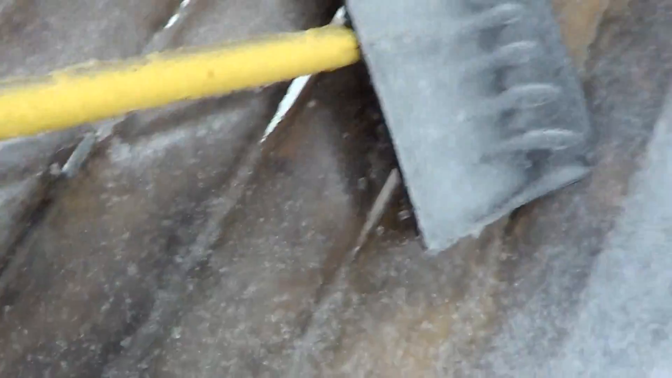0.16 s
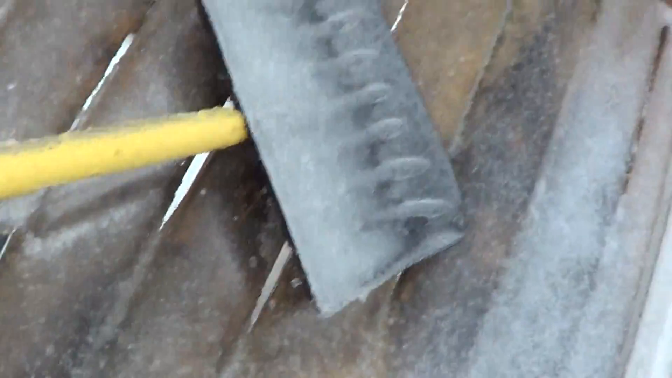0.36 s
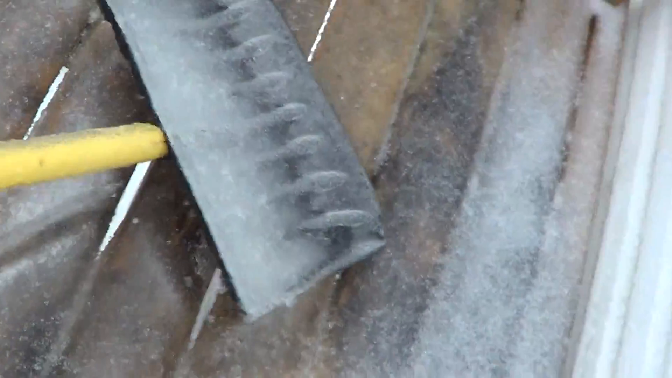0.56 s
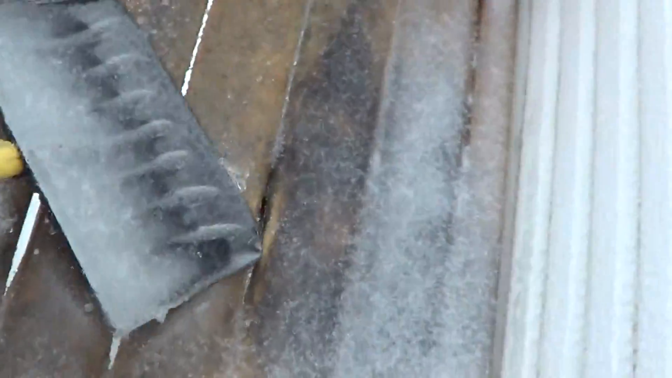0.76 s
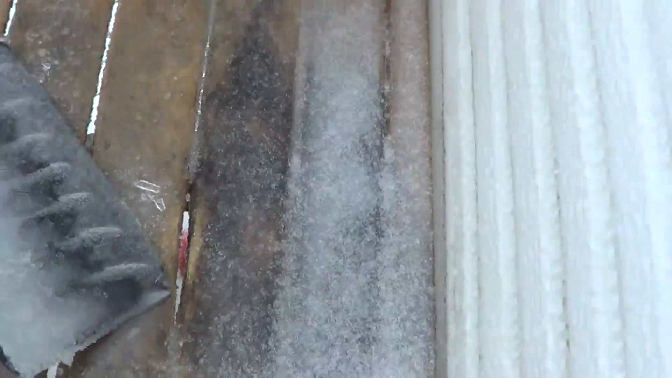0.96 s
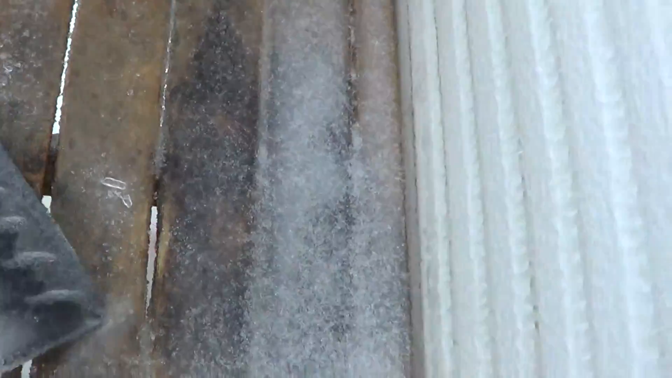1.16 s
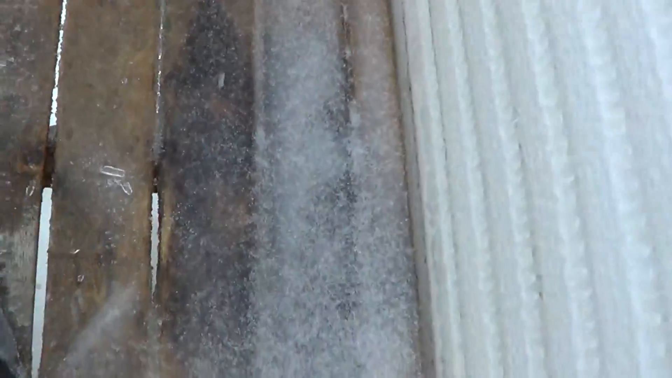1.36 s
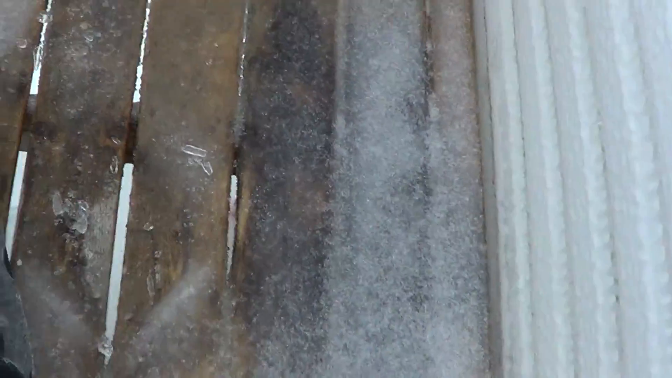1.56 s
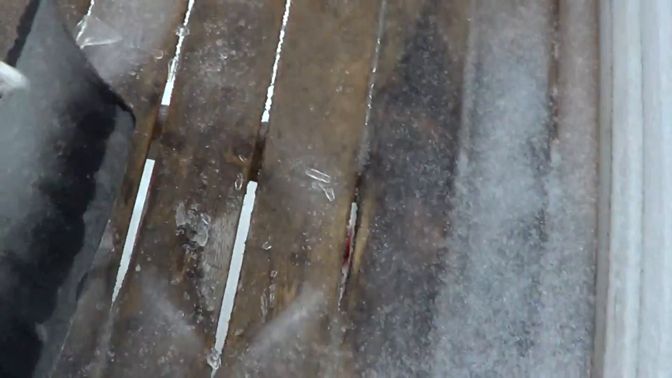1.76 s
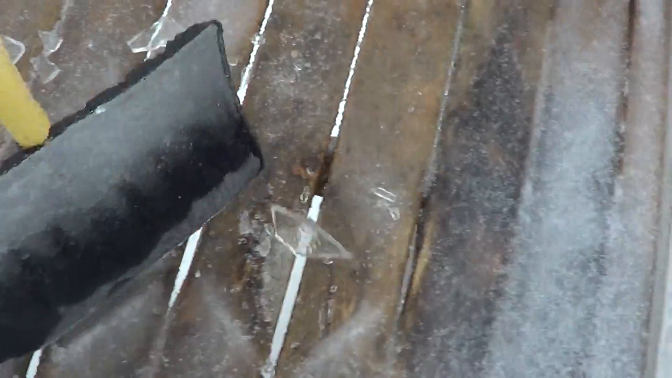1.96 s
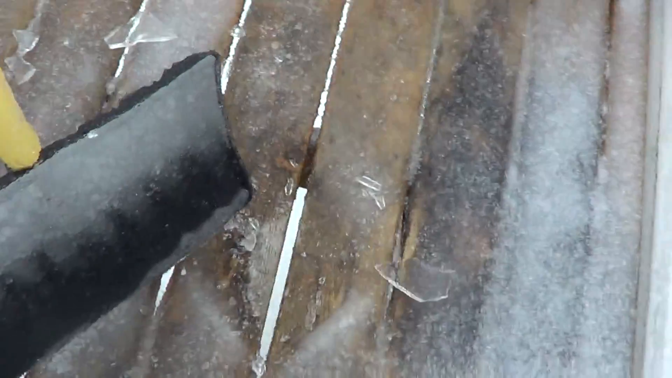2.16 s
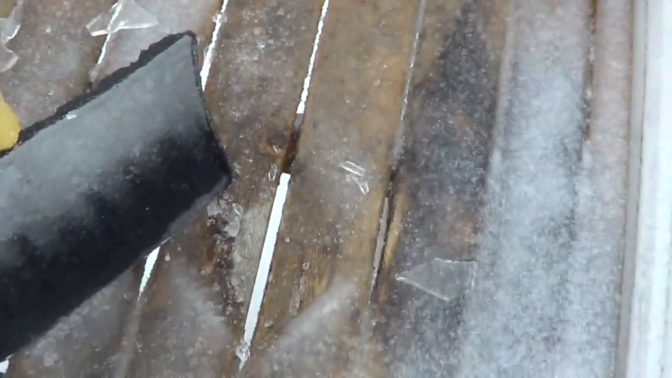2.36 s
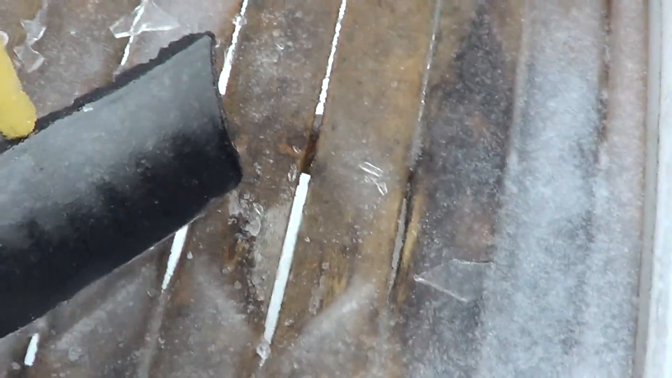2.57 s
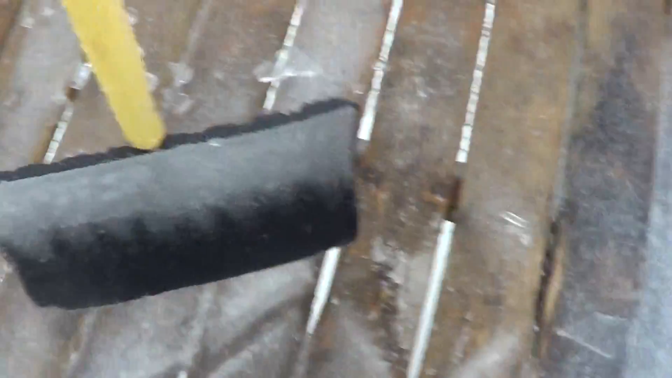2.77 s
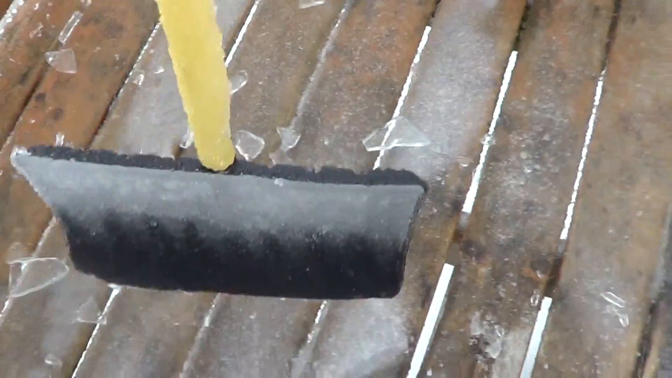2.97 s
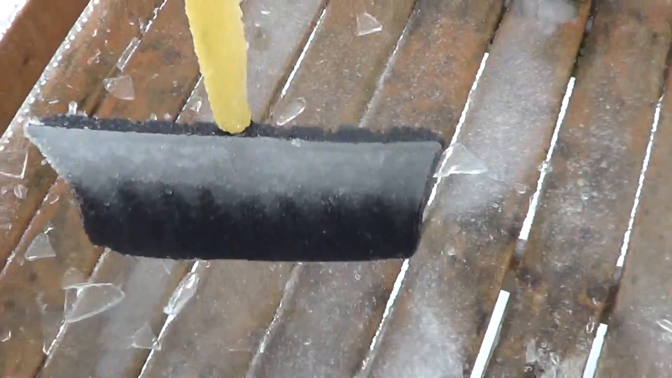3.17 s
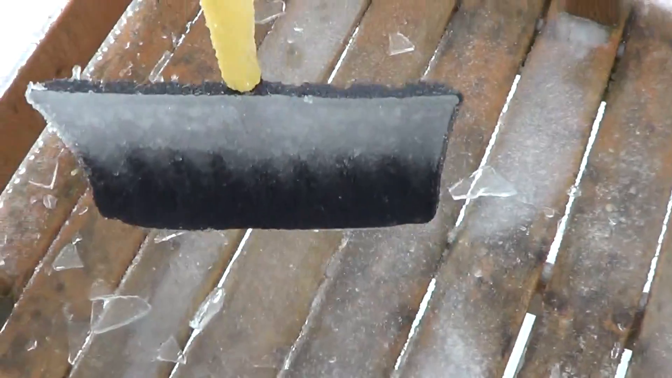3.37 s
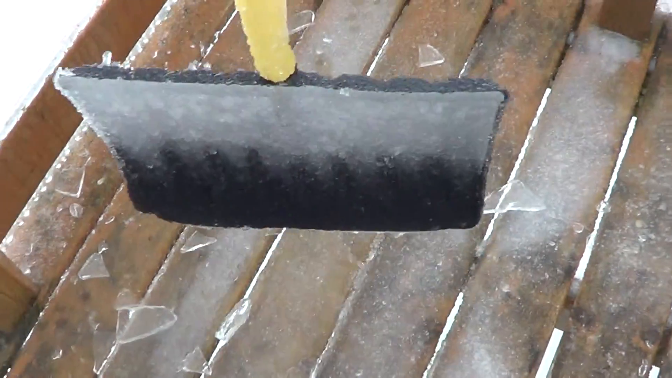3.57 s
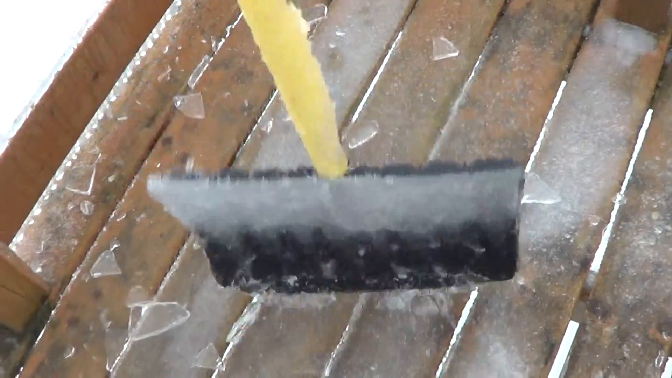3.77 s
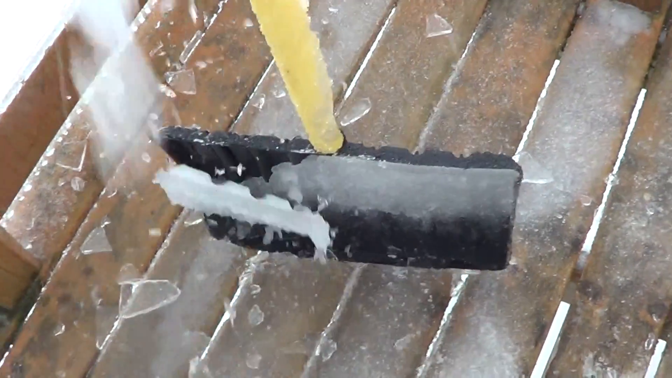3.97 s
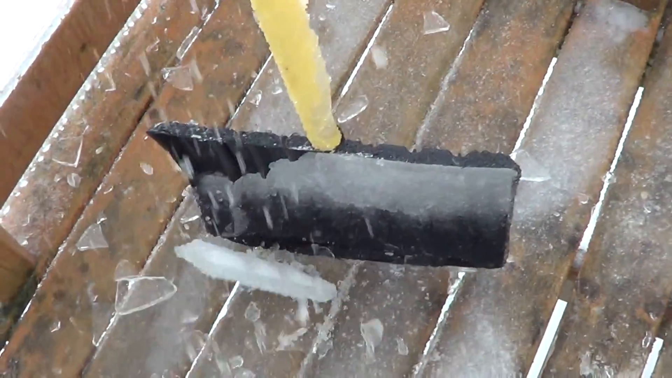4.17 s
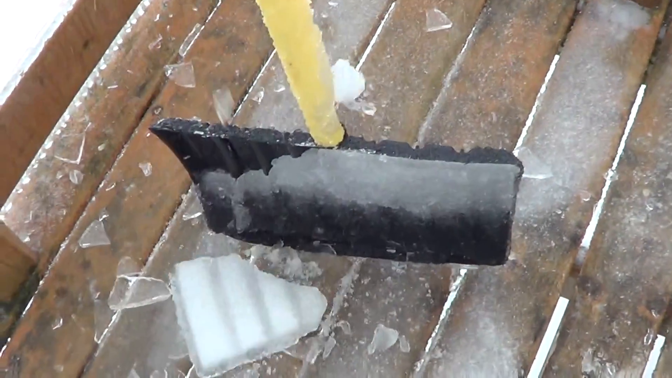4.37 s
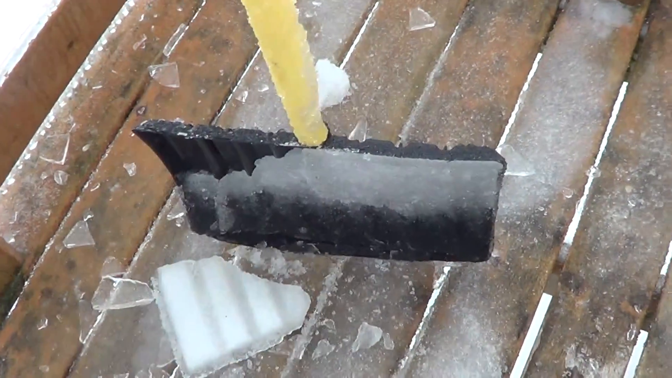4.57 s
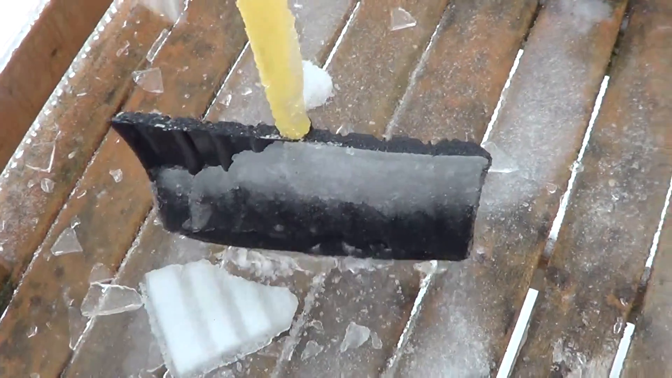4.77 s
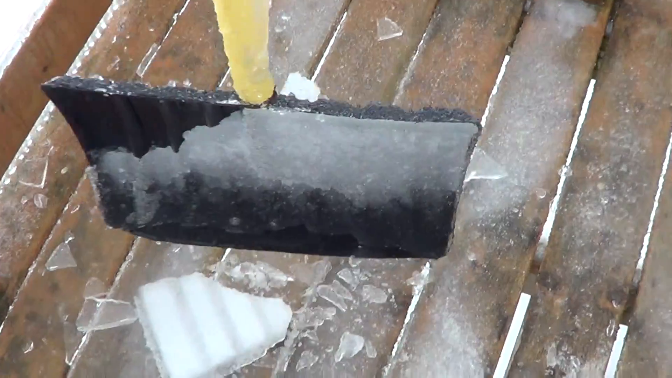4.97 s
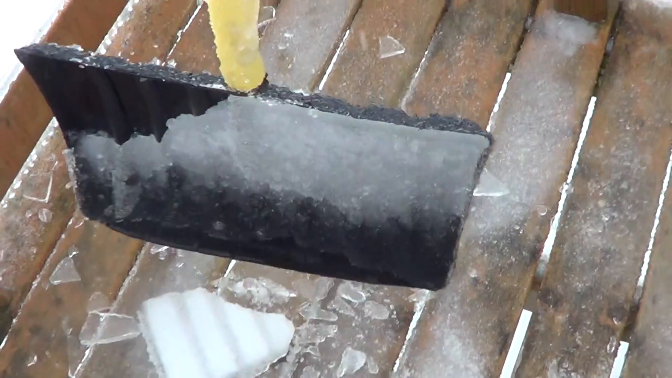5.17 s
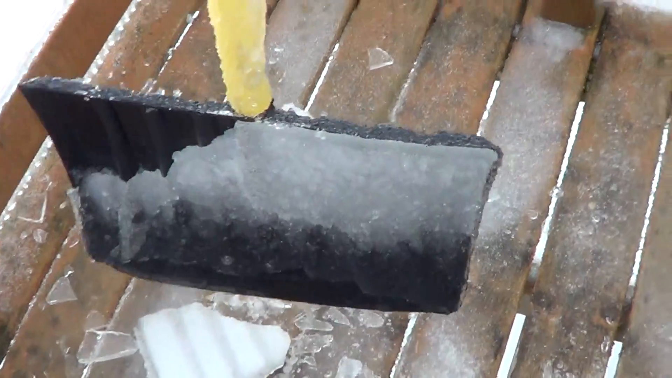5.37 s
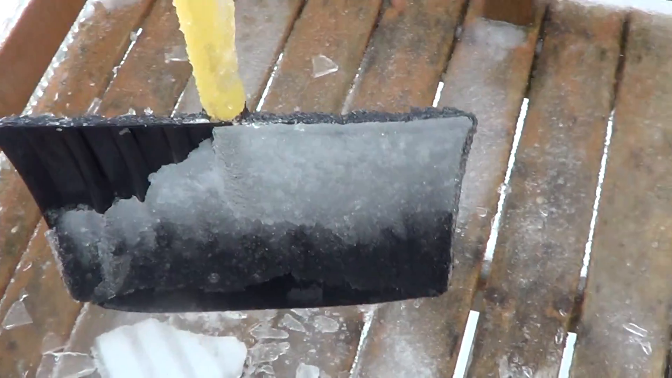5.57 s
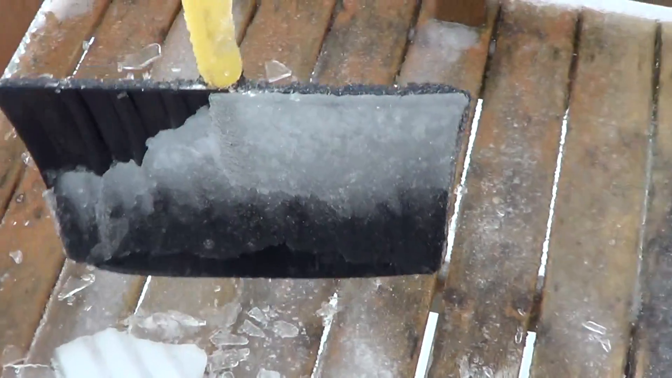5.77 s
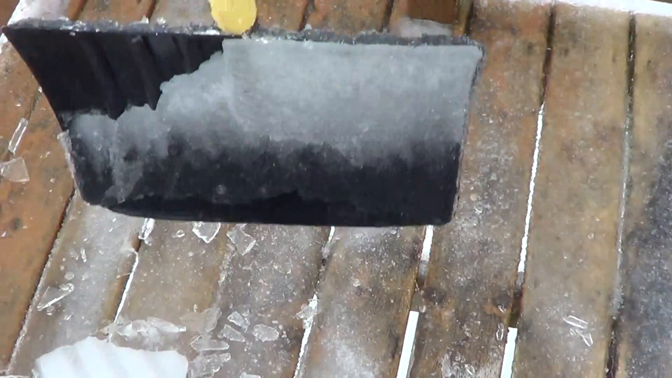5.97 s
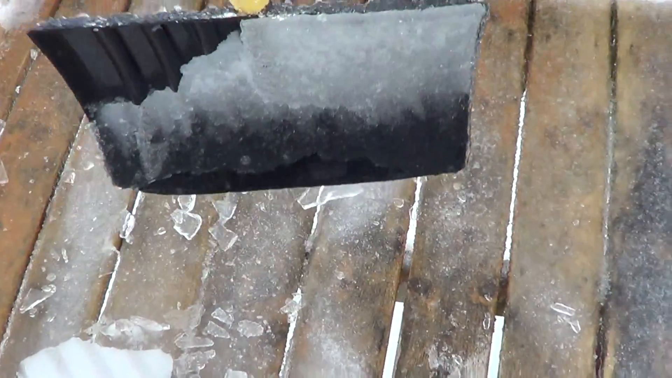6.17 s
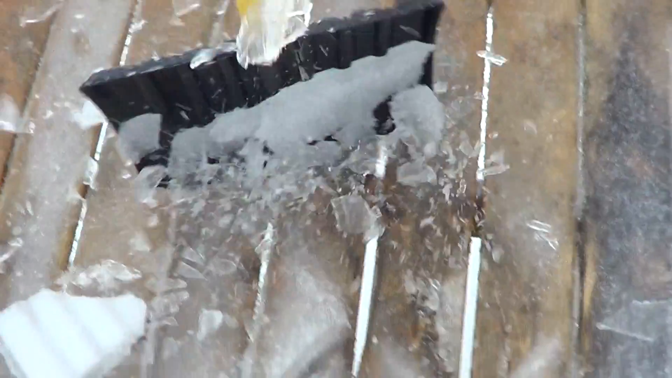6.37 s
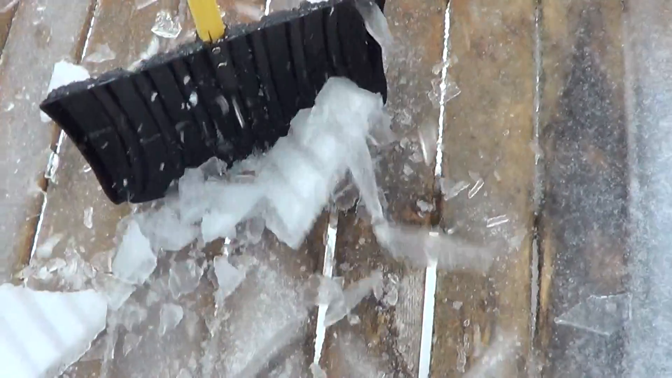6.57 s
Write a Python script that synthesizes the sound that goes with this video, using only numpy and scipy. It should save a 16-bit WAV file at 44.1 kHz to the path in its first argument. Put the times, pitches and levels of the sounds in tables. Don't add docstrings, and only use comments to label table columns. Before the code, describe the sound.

Close up outdoors, a plastic shovel scrapes an icy wooden deck. From 0 to about 1.7 seconds its edge bites in rapid, uneven crunches, gritty and bright, swelling from 1.1 to 1.6 with hard snaps and low wind or handling bumps. A sharp crack at 1.85 and a thud with glassy clinks at 2.06 lead into shorter scrapes, fading by 2.65. A quiet pause follows, with sparse tiny ticks over hiss and faint high whine. At 3.8 the blade knocks hollowly and ice shatters; another thud and burst come at 4.15, more cracking until 4.5. Loose shards clink and tick, thinning through 5.4, with a sharp snap near 5.0. Faint crumbs and light wind gusts fill the second pause. At 6.34 a loud, dense, splintering scrape bursts in and continues to the end at about 6.6.

```python
import sys
import numpy as np
from scipy import signal
from scipy.fft import rfft, irfft
from scipy.io import wavfile
from scipy.ndimage import uniform_filter1d

SR = 44100
rng = np.random.default_rng(int(sys.argv[2]) if len(sys.argv) > 2 else 0)


def put_to_file(sound):
    columns = np.atleast_2d(sound).T
    safe = np.clip(columns, -1, 1)
    whole_steps = np.round(safe * 32767)
    wavfile.write(sys.argv[1], SR, whole_steps.astype(np.int16))


def volts_from_db(level):
    exponent = np.asarray(level, float) / 20
    return 10 ** exponent


N = 291501

# (f/Hz, level/dB)
SPLINTER = [(2530, -48.5), (4300, 5.5), (4650, -3.5), (8140, 5.5), (10000, 5), (14600, -0.5), (15600, -4.5),
            (16200, -11)]
# (f/Hz, level/dB)
BLADE = [(470, -33), (800, -1.5), (1350, 3), (1470, 5), (2610, 5), (3460, 5), (5000, -3.5), (6500, -50),
         (11000, -120)]
# (f/Hz, level/dB)
BOOM = [(59, -23.5), (100, -24), (358, 0.5), (395, -1.5), (653, 4), (1100, -7), (1430, -14), (2420, -120)]
# (from t/s, to t/s)
NO_CRUNCH = [
    (2.68, 3.8105),
    (5.35, 6.2),
    (6.3, 6.336),
]
UPPER_RING_HZ = 1920


def crunch():
    level_db, blade_db, boom_db, upper_db = contact()
    dense = np.clip(volts_from_db(level_db + 26), .02, 1)
    clump = slips() * volts_from_db(1.5 * drift(300)) / np.sqrt(dense)
    fine = grains(20000 * dense, spread_db=2.5, clump=clump)
    fine = fine + 0.16 * grains(303, spread_db=4, clump=dense ** -.15)
    coarse = 0.68 * fine + 0.89 * grains(6000 * dense, spread_db=4, clump=clump)
    ringing = chips(coarse, low_hz=870, high_hz=4220, cycles=12.4, patchy_db=4)
    glassy = chips(fine, low_hz=5240, high_hz=12000, cycles=37, patchy_db=2)

    splinters = colour(fine[None] + 0.88 * glassy, SPLINTER)
    blade = colour(coarse[None] + 0.54 * ringing, BLADE)
    boards = colour(coarse[None], BOOM)
    lower = signal.sosfiltfilt(signal.butter(2, UPPER_RING_HZ, fs=SR, output="sos"), blade)
    blade = lower + volts_from_db(upper_db) * (blade - lower)

    out = volts_from_db(level_db - .8) * rms_one(splinters)
    out = out + volts_from_db(level_db + blade_db - .8) * rms_one(blade)
    out = out + volts_from_db(level_db + blade_db + boom_db - 3) * rms_one(boards)
    s = np.arange(N) / SR
    lifted = sum((s > start) & (s < end) for start, end in NO_CRUNCH)
    return uniform_filter1d(1. - lifted, size=60) * out


# (t/s, pressure as splinter level/dB, blade tilt as blade re splinters level/dB,
# stiffness as upper ring level/dB)
DRAG = [(0, -47, 3.5, -7.5), (.52, -46, 0, -2.5), (.65, -34.5, 4, 0.5), (1.02, -37.5, 2, -1.2),
        (1.5, -42, -1.5, 4), (1.9, -62, -0.5, 0), (2.06, -34.5, -2.5, 0.5), (2.35, -45, -3, -3.5),
        (2.6, -58, 4, -1.5), (3.8, -101, -3.5, 3.3), (4.1, -35.5, -6, -1.5), (4.46, -33.5, -1.5, -0.5),
        (4.58, -44, -7, -2.5), (5.0, -43.5, 0.5, -4), (5.35, -58, -10.5, -3), (6.25, -58.5, -9.5, 0.5),
        (6.345, -53, -2, 2.8), (6.61, -19, -1.5, -5)]
# (t/s, splinter peak level/dB, rise t/s, fall t/s)
BITES = [(0.032, -23.5, 0.048, 0.018), (0.211, -23.5, 0.066, 0.079), (0.288, -30.5, 0.22, 0.32),
         (0.366, -26, 0.08, 0.038), (0.452, -26, 0.092, 0.036), (0.629, -29, 0.11, 0.13),
         (.708, -23.5, 0.063, 0.06), (0.788, -22.5, 0.17, 0.13), (0.869, -27, 0.077, 0.27),
         (0.942, -25.5, 0.37, 0.032), (1.063, -25.5, 0.037, 0.24), (1.137, -20.5, 0.1, 0.069),
         (1.192, -19, 0.016, 0.053), (1.247, -23.5, 0.008, 0.033), (1.264, -22, 0.029, 0.15),
         (1.32, -22, 0.21, 0.086), (1.391, -19.5, 0.18, 0.094), (1.51, -18, 0.034, 0.097),
         (1.6, -17.5, 0.031, 0.021), (1.649, -25.5, 0.092, 0.082), (1.767, -35.5, 0.094, 0.18),
         (1.837, -24, .025, 0.095), (2.005, -32, 0.027, 0.02), (2.026, -25.5, 0.02, 0.035),
         (2.058, -27, 0.014, 0.045), (2.165, -17.5, 0.086, 0.026), (2.217, -30.5, 0.023, 0.086),
         (2.301, -19.5, 0.027, 0.046), (2.345, -24.5, 0.061, 0.04), (2.503, -35.5, 0.043, 0.026),
         (2.652, -33.5, 0.093, 0.016)]
# (t/s, splinter peak level/dB, rise t/s, fall t/s)
SHATTERS = [(3.817, -16.5, 0.0088, 0.076), (3.84, -17, 0.022, .03), (3.858, -20.5, .04, 0.036),
            (3.901, -25.5, .05, 0.21), (4.148, -19, 0.018, 0.048), (4.207, -30, 0.062, 0.34),
            (4.306, -26, 0.023, .07), (4.37, -17.5, 0.021, 0.072), (6.265, -41.5, 0.072, 0.068),
            (6.34, -15.5, 0.007, 0.17), (6.378, -14.5, 0.057, .04), (6.411, -16.5, 0.0067, 0.053),
            (6.465, -17.5, 0.11, 0.083), (6.55, -16, 0.079, .3), (6.609, -15.5, 0.15, .1)]
SWING_DB = 20
BITE_ROUNDING = 1.247
BLADE_YIELD, BOOM_DB, BOOM_YIELD = 0.025, -8, 0.19


def contact():
    level_db, tilt_db, upper_db = in_time(DRAG)
    s = np.arange(N) / SR
    for at, peak_db, rise, fall in BITES + SHATTERS:
        away = np.maximum((at - s) / rise, (s - at) / fall)
        level_db = np.maximum(level_db, peak_db - SWING_DB * away ** BITE_ROUNDING)
    blade_db = tilt_db - BLADE_YIELD * (level_db + 41.5)
    boom_db = BOOM_DB - BOOM_YIELD * (level_db + 25.5)
    return level_db, blade_db, boom_db, upper_db


SLIPS_PER_S, SLIP_T60_S = 260, .012


def slips():
    lets_go = rng.random(N) * (rng.random(N) < SLIPS_PER_S / SR)
    return rms_one(0.91 + signal.lfilter([1], [1, -volts_from_db(-60 / (SLIP_T60_S * SR))], lets_go))


def grains(per_s, spread_db, clump):
    sizes = volts_from_db(spread_db * np.minimum(rng.exponential(1, N), 5)) * rng.choice([-1, 1], N)
    return rms_one(sizes * (rng.random(N) < per_s / SR)) * clump


def chips(clicks, low_hz, high_hz, cycles, patchy_db):
    dealt, out = rng.integers(0, 10, N), 0
    for k, hz in enumerate(np.geomspace(low_hz, high_hz, 10)):
        mine = clicks * (dealt == k) * volts_from_db(patchy_db * drift(24))
        out = out + ring(mine + 1e-18, hz, cycles / hz)
    return rms_one(out)


# (t/s, peak level/dB, clink f/Hz, body re peak level/dB)
CRACKS = [(.3655, -14, 3820, -1), (.4674, -20, 1380, -45), (.5292, -21.5, 8850, -21), (.924, -17, 2460, -9),
          (1.038, -8.5, 1673, -23), (1.1863, -8, 2410, -32), (1.258, -13, 2720, -47),
          (1.4868, -9, 2500, -1.5), (1.717, -15.5, 9350, -44), (1.8469, -1.5, 1480, -11),
          (1.89, -11.5, 11000, -8), (1.94, -16, 11400, -22.5), (2.0555, -11, 8650, -29),
          (2.22, -11.5, 2100, -24), (2.2431, -14, 9900, -9), (2.2743, -13, 9900, -8.5),
          (2.336, -16.5, 5560, -10), (2.394, -24, 9590, -29), (2.4603, -28.5, 8000, -8),
          (2.587, -18.5, 2320, -2.5), (2.62, -29.5, 1550, -16), (6.507, -4, 3160, -30),
          (6.4096, -10, 4100, 0)]
# (t/s, peak level/dB, clink f/Hz, body re peak level/dB)
DEBRIS = [(3.8135, -11.5, 8100, -9.5), (3.8919, -12.5, 8550, -12), (4.0238, -29.5, 6700, -2.5),
          (4.067, -18, 7290, -16), (4.1094, -23, 7850, -19), (4.123, -19, 12000, -30),
          (4.143, -7.5, 10400, -20), (4.2009, -13, 10200, -27), (4.269, -19.5, 8200, -13.5),
          (4.3032, -7, 6800, -20), (4.328, -17, 3980, -17), (4.358, -15, 9200, -5),
          (4.4272, -15, 5430, -15), (4.5082, -29, 8260, -16), (4.5449, -17.5, 11300, -20),
          (4.644, -34, 8000, -16), (4.6634, -28, 9460, -17), (4.7008, -38, 8500, -17),
          (4.848, -23, 8700, -17.5), (4.9423, -21, 9800, -26), (4.9846, -24, 3300, -24),
          (5.0001, -37.5, 3620, -2), (5.0224, -19, 9400, -34), (5.0883, -24, 8370, -19.5),
          (5.134, -29, 10000, -22), (5.1782, -26, 7600, -22), (5.2141, -26, 8800, -30),
          (5.2377, -23, 9500, -32), (5.272, -34, 8820, -31)]
# (t/s, peak level/dB, clink f/Hz, body re peak level/dB)
DROPS = [(2.7606, -23.5, 8150, -12), (2.8327, -35, 8800, -11.5), (2.8673, -29, 6900, -14.5),
         (2.9254, -38, 9540, -17), (2.9817, -39, 8420, -23), (3.293, -38, 6300, -41),
         (3.319, -37, 8460, -19), (3.4323, -31.5, 7900, -16.5), (3.4543, -38, 7100, -30),
         (3.5207, -39, 10800, -25), (3.6084, -36.5, 9800, -17), (3.64, -31, 9820, -49),
         (3.695, -42, 9900, -14),
         (5.4144, -22.5, 9700, -9), (5.4695, -38, 9850, -18), (5.484, -30, 9600, -14.5),
              (5.502, -26, 7700, -50), (5.5613, -27, 8500, -16), (5.6456, -35.5, 10100, -30),
              (5.697, -27.5, 12000, -20), (5.73, -36, 12600, -16.5), (5.747, -31.5, 9350, -31),
              (5.804, -26, 8700, -33), (5.862, -31, 10300, -27), (5.885, -31.5, 10000, -16.5),
              (5.945, -36.5, 10300, -22), (5.9977, -32, 12400, -30), (6.102, -36, 8640, -30),
              (6.127, -29.5, 9600, -48), (6.2362, -30, 8800, -32), (6.249, -23, 10300, -20),
              (6.2797, -36, 9400, -11), (6.3288, -20, 12000, -10.5)]
# (f/Hz, level/dB)
CRACK_COLOUR = [(300, -56), (1200, -13.5), (3000, -6), (4700, -8.5), (6500, -5), (9000, -1), (12500, -1.5),
                (16000, -5)]
# (f/Hz, level/dB)
CRACK_BODY = [(150, -60), (600, -3.5), (1200, 1), (3200, 8.5), (4500, 0), (8000, -53.5)]


def cracks(events, snap_db, ring_db, spray_t60, spray_db):
    bright, body, span = np.zeros(N + SR), np.zeros(N + SR), 6000
    t = np.arange(span) / SR
    for s, peak_db, hz, body_db in events:
        t60 = spray_t60 * (hz / 6000) ** 0.12 * volts_from_db(-.15 * (peak_db + 19.5))
        fade = volts_from_db(spray_db - 60 * t / t60) + volts_from_db(spray_db - 14 - 60 * t / (5.4 * t60))
        spray = rng.standard_normal(span) * volts_from_db(5 * rng.standard_normal(span)) * fade
        spray[0] = 1
        partials = np.minimum(hz * np.array([1, 1.31, .72]), .4 * SR)
        clink = sum(ring(spray, f, 6.3 / f) for f in partials) * volts_from_db(ring_db)
        at, gain = round(s * SR), volts_from_db(peak_db + snap_db)
        bright[at:at + span] += gain * (0.73 * spray + clink)
        body[at:at + span] += gain * volts_from_db(body_db + 12.5) * spray
    return colour(bright[None, :N], CRACK_COLOUR) + colour(body[None, :N], CRACK_BODY)


# (t/s, peak level/dB)
SNAPS = [(0.0642, -15), (0.467, -9.5), (0.7031, -8), (0.714, -6), (0.7539, -14), (0.789, 1), (0.8213, -2),
         (0.8611, -18), (0.925, -7), (1.1915, -14), (1.2124, -15.5), (1.2711, -1), (1.2916, 2),
         (1.3372, -7), (1.4068, -13), (1.7603, -14.5), (1.89, -15), (2.0564, 1.5), (2.2197, -4),
         (2.2437, -8), (2.2696, -8), (2.2748, -14), (2.3367, -18), (2.628, -16), (3.893, -14), (3.904, -5),
         (3.9183, -5.5), (4.0248, -14), (4.1234, -15), (4.203, -16), (4.2285, -9), (4.2804, -8),
         (4.3032, -19), (4.3285, -20), (4.3606, -4), (4.5097, -21), (4.6099, -24), (4.8482, -11),
         (5.002, -17), (5.0247, -1), (5.1777, -27), (5.4143, -18), (6.343, -10), (6.411, -14), (6.506, 1),
         (6.5254, -13), (.3657, -10), (2.6586, -18), (2.7579, -19), (2.8755, -21), (4.1399, -5),
         (4.237, -18), (4.3137, -14), (4.8118, -19), (5.081, -23), (5.4364, -22), (5.5082, -14),
         (5.5615, -19), (5.991, -25), (6.0013, -28)]
SNAP_HZ, SNAP_T60_S = 8700, 0.00097


def snaps():
    clicks = np.zeros((1, N))
    s, peak_db = np.transpose(SNAPS)
    clicks[0, (s * SR).astype(int)] = volts_from_db(peak_db) * (-1.) ** np.arange(len(s))
    return volts_from_db(3.5) * ring(clicks, SNAP_HZ, SNAP_T60_S) + volts_from_db(-11) * colour(clicks, CRACK_BODY)


# (t/s, f/Hz, level/dB)
PINGS = [(1.257, 2900, -19.5), (1.891, 10300, -15.5), (1.892, 7850, -23), (2.055, 5800, -30),
         (2.069, 8100, -28), (2.241, 12520, -27), (2.242, 9900, -25), (2.274, 5670, -23),
         (2.274, 10100, -16.5), (2.308, 5740, -26), (2.308, 8100, -23), (2.335, 2800, -26),
         (2.336, 5760, -21), (2.596, 2900, -47), (2.643, 9100, -34), (2.645, 3420, -33.5),
         (2.868, 6030, -36), (3.293, 5800, -51), (3.432, 9560, -41), (3.433, 7350, -43.5),
         (4.358, 5020, -23), (4.371, 9300, -26), (4.508, 8150, -32), (4.544, 11140, -26),
         (5.134, 10100, -40), (5.236, 6660, -31), (5.236, 10100, -30), (5.419, 10450, -36),
         (5.561, 10220, -48), (6.102, 8300, -42)]
# (t/s, peak level/dB, f/Hz)
TICKS = [(3.6235, -31, 9510), (3.6676, -30, 8870), (3.882, -7.5, 3060), (3.957, -13, 5000),
         (3.9824, -31, 7810), (4.085, -9.5, 8800), (4.4624, -30, 9820), (4.485, -20, 8320),
         (4.494, -11, 8140), (4.5594, -20, 5700), (4.5664, -19, 9250), (4.609, -29, 8700),
         (4.67, -27, 8260), (4.7064, -32, 8430), (4.795, -30.5, 9320), (4.8743, -30, 10300),
         (4.915, -25, 11100), (4.964, -13.5, 9000), (4.977, -18, 9040), (5.069, -26, 6840),
         (5.077, -26, 8390), (5.167, -21, 9860), (5.171, -17, 10300), (5.1779, -17, 6700),
         (5.1944, -24, 10400), (5.2016, -23, 10000), (5.261, -22, 9920), (5.287, -31, 9920),
         (5.2964, -33, 10000), (5.3163, -35, 10500), (5.3238, -31, 10500), (5.3642, -36, 8580),
         (5.3961, -34, 10500), (5.835, -42, 9470), (5.9014, -44, 7870), (6.0344, -43, 11200),
         (6.083, -39, 8160), (6.1639, -38.5, 12100), (6.2158, -27.5, 9100)]
# (t/s, f/Hz, level/dB)
KNOCKS = [(1.64, 477, -30), (1.65, 333, -36.5), (1.645, 844, -29.5), (1.77, 528, -37.5), (1.84, 441, -29.5),
          (1.875, 800, -34), (2.025, 487, -35), (2.215, 500, -36), (2.243, 632, -28), (2.295, 1170, -41),
          (2.335, 863, -33), (2.48, 514, -40), (2.498, 385, -38.5), (2.562, 550, -38), (2.59, 407, -43),
          (2.62, 473, -38), (2.64, 557, -39.5), (3.814, 324, -22.5), (3.818, 654, -26), (3.84, 236, -37.5),
          (4.066, 302, -45), (4.152, 195, -30), (4.178, 245, -30), (4.375, 302, -31.5), (4.495, 826, -36),
          (4.606, 850, -43.5), (5.416, 520, -44), (5.52, 430, -52.5), (5.6, 270, -51), (5.86, 139, -44.5),
          (5.97, 165, -47), (6.345, 287, -29.5), (6.44, 253, -37), (6.48, 210, -36), (6.535, 286, -32.5),
          (6.565, 1615, -23)]


def shards():
    ticks = [(s, hz, db - 7.5) for s, db, hz in TICKS]
    overtones = [(s, share * hz, db - 10.5) for s, hz, db in ticks for share in (.37, .66, 1.36)]
    out = volts_from_db(4) * damped_notes(PINGS, t60=0.016, rise=.0008)
    out = out + damped_notes(ticks + overtones, t60=.0035, rise=.0001)
    return out + damped_notes(KNOCKS, t60=0.072, rise=0.0011)


def damped_notes(events, t60, rise):
    out, t = np.zeros(N + SR), np.arange(8000) / SR
    shape = (1 - np.exp(-t / rise)) * volts_from_db(-60 * t / t60)
    shape = shape / shape.max()
    for s, hz, level_db in events:
        main = np.sin(2 * np.pi * hz * t)
        neighbour = .6 * np.sin(2 * np.pi * hz * t * rng.uniform(.94, 1.06))
        out[round(s * SR):][:len(t)] += volts_from_db(level_db) * shape * (main + neighbour)
    return out[:N]


# (t/s, f/Hz, level/dB, t60 t/s)
TINKLES = [(0.029, 1110, -14.5, 0.045), (2.28, 5900, -29, 0.045), (0.205, 1493, -32, 0.087),
           (2.057, 1820, -15.5, 0.043), (2.373, 3370, -36.5, 0.14), (2.873, 1320, -36, 0.02),
           (4.026, 6900, -27, 0.026), (4.366, 1207, -12, 0.026), (4.522, 11660, -25, 0.04),
           (5.233, 4000, -40, 0.037), (5.75, 9310, -41, 0.16)]


def tinkles():
    out, t = np.zeros(N + SR), np.arange(9000) / SR
    for s, hz, level_db, t60 in TINKLES:
        rattle = rng.standard_normal(len(t)) * volts_from_db(-60 * t / 0.0065)
        note = ring(rattle, hz, t60)
        out[round(s * SR):][:len(t)] += volts_from_db(level_db) * note / np.abs(note).max()
    return out[:N]


# (t/s, peak level/dB, t60 t/s, strongest f/Hz)
THUDS = [(2.059, -15.5, 0.21, 350), (2.268, -28, 0.51, 567), (3.812, -28, 0.29, 640),
         (3.892, -21.5, 0.24, 511), (4.148, -12.5, 0.17, 646), (4.209, -23, 0.079, 640),
         (4.276, -20.5, 0.11, 400), (4.379, -24, 0.34, 794), (5.035, -40, 0.082, 664),
         (5.414, -32, 0.14, 300), (6.343, -31.5, 0.97, 295)]
# (f/Hz, level/dB, t60 t/s)
BOARDS = [(192, -5, 0.12), (308.2, -3, 0.27), (350, 17.5, 0.01), (520, 14.5, 0.029), (641, -1.5, 0.041)]


def thuds():
    out, t = np.zeros(N + SR), np.arange(8192) / SR
    for s, peak_db, t60, spot_hz in THUDS:
        push = rng.standard_normal(len(t)) * volts_from_db(-60 * t / (0.41 * t60))
        modes = 2.05 * ring(push, spot_hz, 0.29 * t60)
        for hz, db, own_t60 in BOARDS:
            octaves_off = abs(np.log2(hz / spot_hz))
            modes = modes + volts_from_db(db - 5.8 * octaves_off) * ring(push, hz, own_t60 * t60 / 0.18)
        out[round(s * SR):][:len(t)] += volts_from_db(peak_db + 3.5) * modes / np.abs(modes).max()
    return signal.sosfilt(signal.butter(2, 1200, fs=SR, output="sos"), out[None, :N])


# (f/Hz, side re mid level/dB)
WIDTH = [(60, -13), (110, -5), (200, 2), (380, -1.5), (700, -8), (1290, -6.5), (2380, -9), (4400, -1.5),
         (8120, -8), (15000, -14.5)]


def deck(x):
    t = np.arange(6000) / SR
    tail, paths = rng.standard_normal((2, 6000)) * volts_from_db(-60 * t / [[.09], [.012]])
    tail[:60] = 0
    mid = x.mean(axis=0)
    echo = volts_from_db(-6) * signal.fftconvolve(mid * drift(24.3), tail / np.linalg.norm(tail))[:N]
    moving = (mid + echo) * np.tanh(2 * drift(29.5))
    side = signal.fftconvolve(moving, paths / np.linalg.norm(paths))[None, :N]
    return x + echo + volts_from_db(-9) * colour(side, WIDTH) * [[1], [-1]]


# (t/s, level/dB)
WIND = [(0, -51), (.1, -64), (.35, -54.5), (.7, -67), (1.3, -47), (1.9, -61.5), (2.4, -54), (2.9, -75),
        (3.2, -60), (3.7, -72), (4.6, -64), (5.15, -51), (5.43, -48), (5.7, -57), (5.9, -62), (6.03, -44),
        (6.28, -58), (6.6, -52)]
# (t/s, level/dB)
BUMPS = [
    (0.989, -32),
    (1.2, -31),
    (1.48, -42.5),
    (1.902, -51),
    (2.38, -43),
    (3.22, -56),
    (3.48, -60.5),
    (3.84, -48),
    (6.37, -43.5),
]
BUMP_DB_PER_S = 218


def gusts():
    s = np.arange(N) / SR
    bumps = [db - BUMP_DB_PER_S * abs(s - at) for at, db in BUMPS]
    return np.max(in_time(WIND) + bumps, axis=0)


# (f/Hz, level/dB)
GUST = [(20, -33), (50, -13), (100, -4.5), (200, -7), (400, -15), (900, -52)]


def wind():
    shared, own = rng.standard_normal((1, N)), rng.standard_normal((2, N))
    lumps = volts_from_db(3 * drift(20))
    return volts_from_db(gusts() - 0.5) * rms_one(lumps * colour(shared + 1.2 * own, GUST))


# (t/s, level/dB)
JOLTS = [
    (2.765, -47.5),
    (2.95, -57),
    (3.62, -52),
    (5.25, -53),
    (5.85, -52.5),
    (6.05, -56),
    (6.3, -40),
]
CRUMBS_FADE_DB_PER_S = 33


def trickle():
    s = np.arange(N) / SR
    runs = [db - np.maximum(CRUMBS_FADE_DB_PER_S * (s - at), 300 * (at - s)) for at, db in JOLTS]
    return np.max(runs, axis=0)


# (f/Hz, level/dB)
HISS = [(40, -16), (200, -8), (391, -5), (649, -5), (1860, -12), (4510, -15), (9150, -11.5), (14400, -17),
        (15200, -10.5)]
# (f/Hz, side re mid level/dB)
HISS_WIDTH = [(200, -11), (1300, -3), (4400, -6), (8000, -6), (15000, -10.5)]
HISS_DB, WHINE_HZ, WHINE_DB = -58.5, 15600, -63


def air():
    side = volts_from_db(-5.5) * colour(rng.standard_normal((1, N)), HISS_WIDTH)
    hiss = colour(rng.standard_normal(N) + side * [[1], [-1]], HISS)
    ticks = grains(2000, spread_db=3.5, clump=volts_from_db(3 * drift(30)))
    crumbs = chips(ticks, low_hz=6140, high_hz=13500, cycles=6, patchy_db=5)
    whine = rms_one(ring(rng.standard_normal(N), WHINE_HZ, 0.016))
    return volts_from_db(HISS_DB + 3) * hiss + volts_from_db(trickle()) * crumbs + volts_from_db(WHINE_DB) * whine


def rms_one(x):
    return x / np.sqrt(np.mean(x ** 2) + 1e-20)


def in_time(rows):
    s, *columns = np.transpose(rows)
    return [np.interp(np.arange(N) / SR, s, c) for c in columns]


def colour(x, points):
    hz, level_db = np.transpose(points)
    grid = np.maximum(np.arange(2049) * SR / 4096, 1)
    log_gain = np.interp(np.log(grid), np.log(hz), level_db) * np.log(10) / 20
    cepstrum = irfft(log_gain)
    cepstrum[1:2048] *= 2
    cepstrum[2049:] = 0
    taps = irfft(np.exp(rfft(cepstrum)))
    return signal.fftconvolve(x, np.atleast_2d(taps / np.linalg.norm(taps)), axes=-1)[..., :N]


def drift(rate):
    r = np.exp(-2 * np.pi * rate / SR)
    return rms_one(signal.lfilter([1], [1, -2 * r, r * r], rng.standard_normal(N + SR))[SR:])


def ring(x, hz, t60):
    r, w = volts_from_db(-60 / (t60 * SR)), 2 * np.pi * hz / SR
    return signal.lfilter([.5, 0, -.5], [1, -2 * r * np.cos(w), r * r], x)


def scene():
    ice = crunch() * volts_from_db([[.6], [-.6]])
    ice = ice + cracks(CRACKS, snap_db=-5.5, ring_db=-4, spray_t60=0.016, spray_db=-10.5)
    ice = ice + cracks(DEBRIS, snap_db=4.5, ring_db=-12, spray_t60=0.019, spray_db=-14.5)
    ice = ice + cracks(DROPS, snap_db=2, ring_db=-7.5, spray_t60=0.017, spray_db=-16.5)
    ice = ice + snaps() + shards() + tinkles() + thuds()
    return deck(ice) + wind() + air()


def low_pass(x):
    return signal.sosfilt(signal.butter(12, 16850, fs=SR, output="sos"), x)


def record(dry):
    rounded = 0.58 * np.tanh(dry / 0.72)
    mix = signal.sosfilt(signal.cheby2(10, 40, 16330, fs=SR, output="sos"), rounded)
    return low_pass(mix)


dry = scene()
out = record(dry)
put_to_file(out)
```